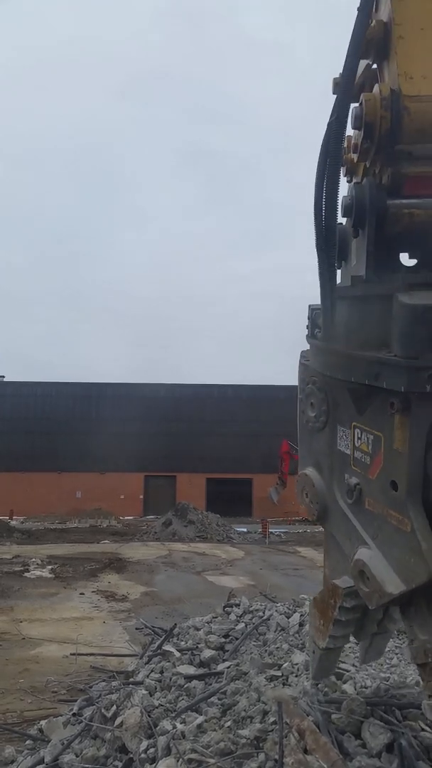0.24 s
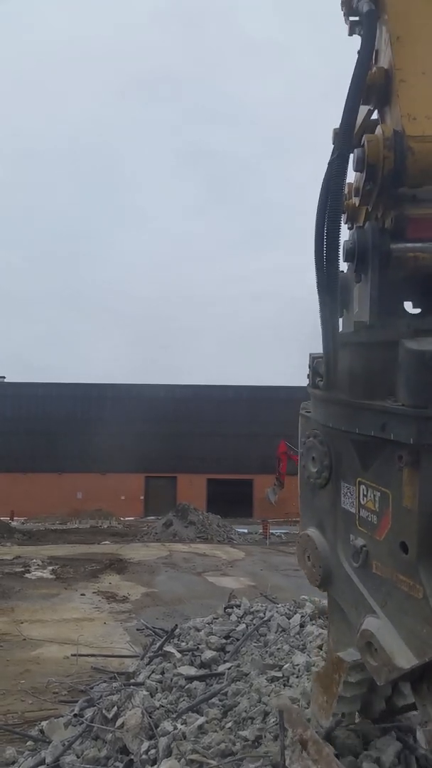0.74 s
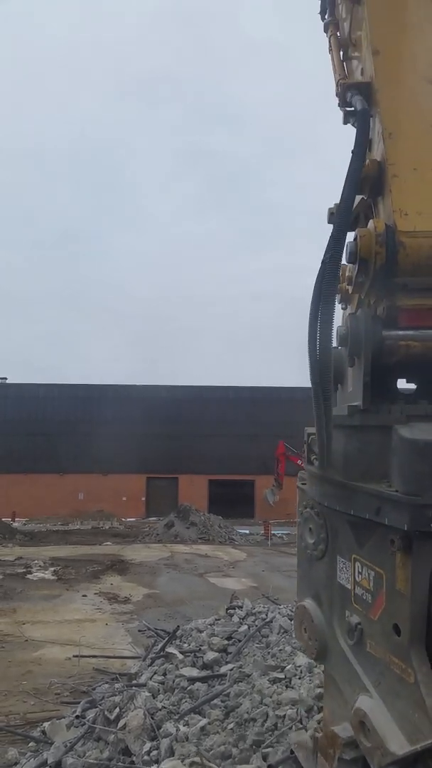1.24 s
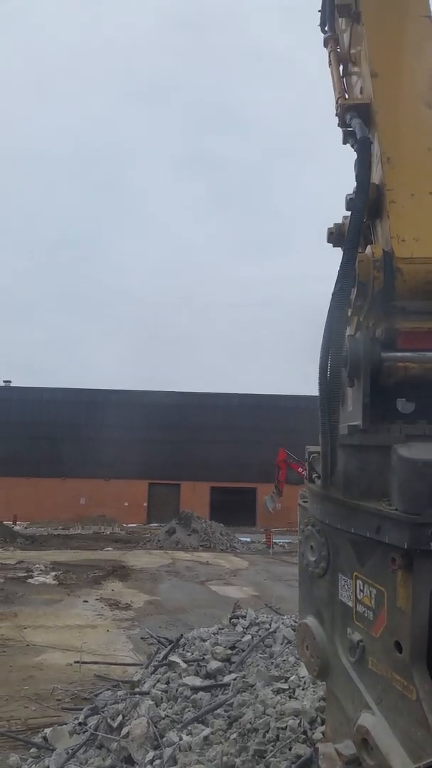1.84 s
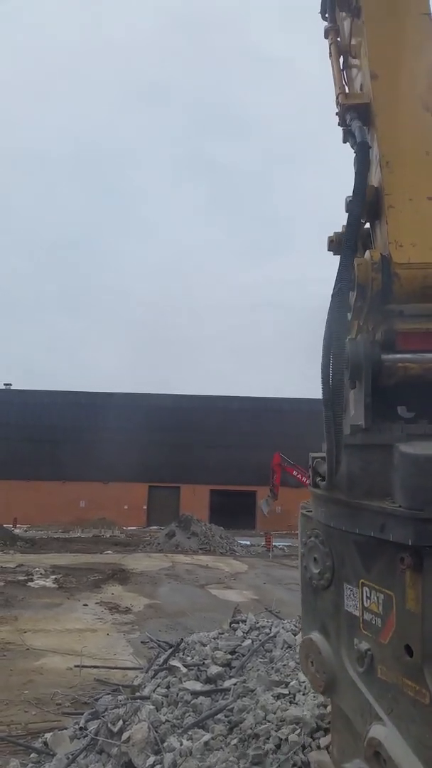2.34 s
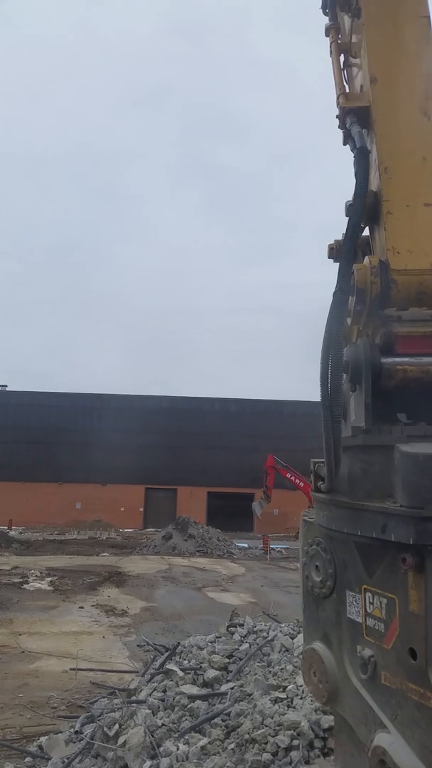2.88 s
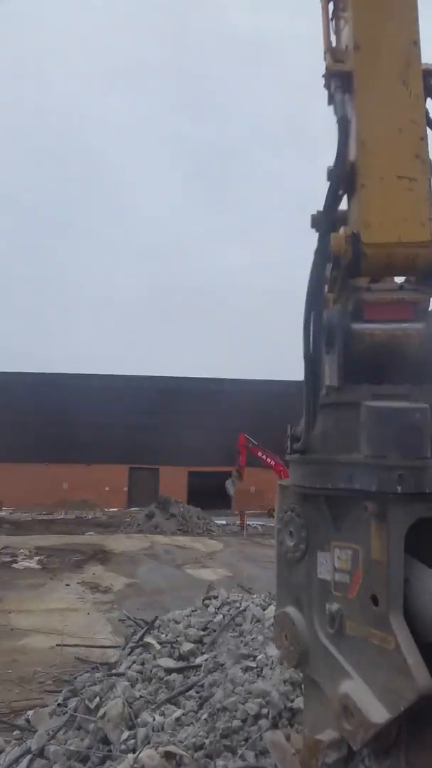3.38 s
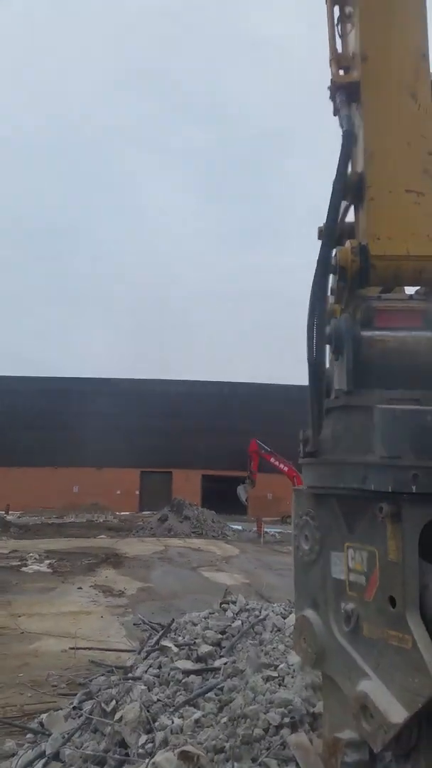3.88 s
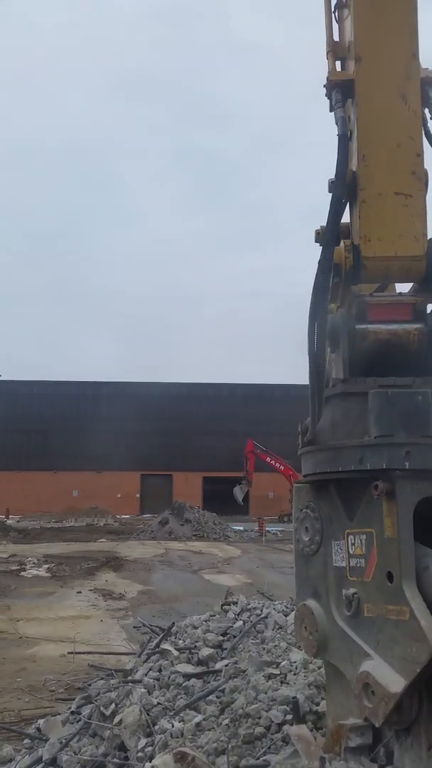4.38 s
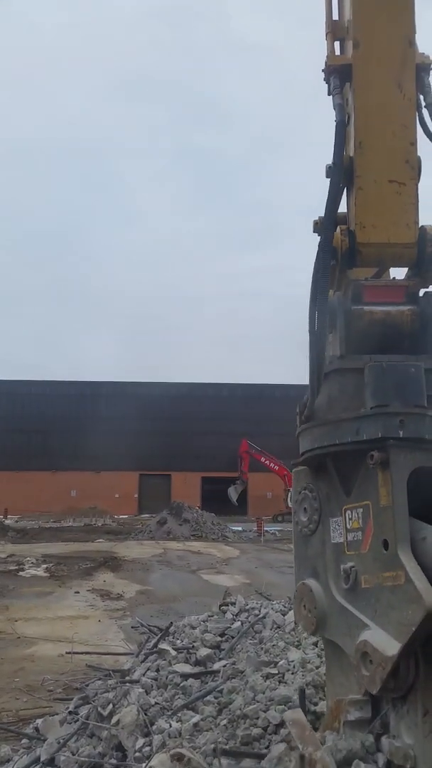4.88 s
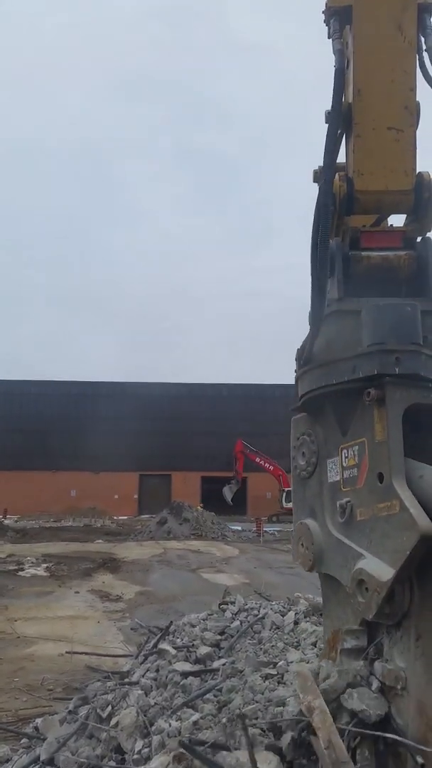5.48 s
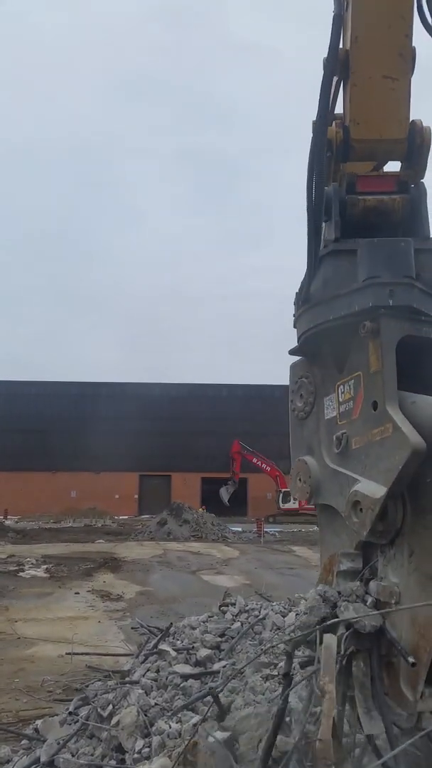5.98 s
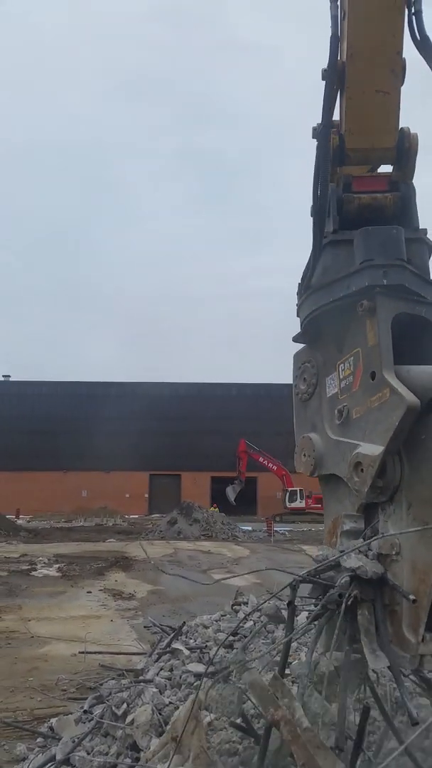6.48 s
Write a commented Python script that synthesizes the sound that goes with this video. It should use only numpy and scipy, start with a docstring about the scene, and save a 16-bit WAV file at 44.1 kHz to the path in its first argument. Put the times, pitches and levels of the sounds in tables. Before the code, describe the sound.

A large diesel excavator labours close by outdoors, with low firing drone, pump whine and a hydraulic hiss swelling just after one second, then easing to a lighter idle. The left microphone hears it clearly; the right is covered by a finger, so the machine is dull there under rubbing, popping thumps and sharp case creaks, worst between three and four seconds, some overloading.

```python
"""A diesel excavator works a concrete crusher in an open yard: crankshaft orders, pump whine and shaped oil noise.
The left microphone port is open to it. A finger covers the right one: a filter and a short delay dull the machine.
Skin drags as lumpy noise and slips in pulses that ring the air pocket and knock the case.
The case creaks in clusters of decaying modes. The loudest thumps clip."""
import sys
import numpy as np
from scipy import signal
from scipy.fft import rfft, irfft, next_fast_len
from scipy.io import wavfile
from scipy.ndimage import map_coordinates

SR = 44100
rng = np.random.default_rng(int(sys.argv[2]) if len(sys.argv) > 2 else 0)


def put_to_file(sound):
    """Save the sound as 16-bit audio at rate SR, in the file named by the first command-line argument."""
    columns = np.atleast_2d(sound).T  # one column per channel
    safe = np.clip(columns, -1, 1)
    whole_steps = np.round(safe * 32767)
    wavfile.write(sys.argv[1], SR, whole_steps.astype(np.int16))


N = 296793

# Levels in the tables are relative: the functions add mix gains. Spectra give shape.
# engine load, heavy while the arm comes down: (time [s], firing level [dB], casing roar level [dB])
ENGINE_LOAD = [(0, -15, -24), (.3, -16.5, -23), (.6, -18, -24), (1.0, -15.5, -19.5), (1.42, -16, -19.5),
               (1.53, -26, -27), (1.68, -27, -24.5), (1.85, -28, -36.5), (2.15, -29.5, -33),
               (3.22, -27, -29), (3.95, -29, -35), (4.3, -29, -28.5), (5.38, -26.5, -31.5),
               (5.72, -30.5, -40.5), (6.0, -23, -33), (6.73, -22, -32.5)]
# crankshaft speed: (time [s], frequency [Hz])
CRANK_SPEED = [(0, 29.65), (.25, 30.8), (.5, 30.4), (.78, 29.7), (1.05, 29.6), (1.35, 29.85), (1.9, 31.21),
               (2.3, 30.16), (3.2, 30.59), (4.05, 30.76), (4.35, 30), (4.85, 30.72), (5.4, 30.13),
               (5.9, 29.75), (6.35, 29.56), (6.73, 29.6)]
# engine firing tones: (multiple of crankshaft speed [1], level [dB])
FIRING_ORDERS = [(2, 4), (3, -11), (4, -9), (5.5, -14), (6, -13)]
# gear tones: (multiple of crankshaft speed [1], level [dB])
GEAR_ORDERS = [(9, -5), (10, -4), (13.4, -9), (14, -7), (19.1, -10), (20, -5), (22.4, -8), (24, -10)]
# pumps and drive gears feeding a cylinder: (start [s], end [s], multiple of crankshaft speed [1], level [dB])
PUMP_WHINES = [(.14, .5, 10, -24.5), (1.02, 1.42, 10, -30), (.68, 1.4, 15, -25.5), (.08, .6, 30, -34.5),
               (1.38, 1.48, 30, -37), (2.03, 2.2, 30, -40), (4.3, 5.1, 18, -39), (5.88, 6.38, 18, -35.5)]
PUMP_RISE_S, PUMP_FALL_S = 0.14, 0.052
# the fan holds its own pitch; level relative to the casing roar curve
FAN_HZ, FAN_DB = 445, -11
# exhaust rumble spectrum: (frequency [Hz], density [dB per Hz])
RUMBLE_SPECTRUM = [(15, -70), (28, 10.5), (70, 8.5), (98, 19.5), (135, 10), (230, 10.5), (500, -61.5)]
# rumble level over the roar curve where that is at FULL_ROAR_DB, and its growth
FULL_ROAR_DB, RUMBLE_OVER_DB, RUMBLE_DB_PER_ROAR_DB = -26.5, -0.5, 0.94
# casing roar spectrum: (frequency [Hz], density [dB per Hz])
ROAR_SPECTRUM = [(100, -10), (220, -9.5), (300, 12.5), (430, 3), (650, -0.5), (900, -11.5), (1200, -29.5),
                 (2000, -12.5), (4000, -75.5)]
# exhaust booms under load: (start [s], end [s], level [dB])
BOOMS = [(0.22, 0.372, -21.5), (.62, 0.774, -19.5), (1.24, 1.46, -18.5), (2.572, 2.637, -26),
         (4.956, 5.548, -27.5)]
BOOM_HZ, BOOM_WANDER_HZ, BOOM_FADE_S = 92.12, 2.45, .09
# oil flow through the valves: (time [s], hiss level [dB], jet sizzle level relative to the hiss [dB])
OIL_FLOW = [(0, -39.5, -11.5), (.45, -36.5, -13), (1.2, -23, -18), (1.4, -30, -17.5), (1.53, -43.5, -9),
            (2.1, -38.5, -17.5), (2.83, -35.5, -22.5), (3.9, -45, -14), (4.2, -41.5, -22),
            (5.35, -38.5, -24), (5.85, -41, -15), (6.08, -37, -14), (6.35, -41.5, -11), (6.73, -42, -19)]
# oil hiss spectrum: (frequency [Hz], density [dB per Hz])
HISS_SPECTRUM = [(400, -21), (800, 0.5), (1100, 1), (1400, -4), (1720, -3), (2100, -7.5), (2650, -9),
                 (3000, -26), (4200, -29), (5400, -49.5), (8000, -74)]
# oil jet sizzle spectrum: (frequency [Hz], density [dB per Hz])
SIZZLE_SPECTRUM = [(1800, -13.5), (2900, 3), (4300, -8.5), (5000, -25), (6000, -33.5), (8000, -57.5),
                   (15000, -63)]
# valve block resonances: (frequency [Hz], level [dB])
VALVE_MODES = [(1290, -2.5), (1420, -3.5), (1570, -4), (1700, -1), (2590, -7), (2740, -12)]
VALVE_DB = -1.5  # relative to the hiss curve
# oil surges through the valves: (start [s], end [s], level [dB])
SURGES = [(1.08, 1.381, -36.5), (1.335, 1.376, -32), (2.81, 3.196, -47.5), (6.138, 6.16, -34.5),
          (6.211, 6.223, -38)]
# oil surge spectrum: (frequency [Hz], density [dB per Hz])
SURGE_SPECTRUM = [(700, -16), (1750, 5.5), (2200, -2.5), (2650, 1), (3000, -10), (3500, -3.5), (4200, -14),
                  (5200, -29.5), (8000, -56.5)]
# the rise is a fixed time plus a share of the surge's length
SURGE_RISE_S, SURGE_RISE_SHARE, SURGE_FALL_S = .035, .7, .09
# steel scraping in the jaws: (time [s], length [s], frequency [Hz], width [Hz], level [dB])
SCRAPES = [(0.86, 0.12, 3810, 280, -40), (4.492, 1.25, 1455, 169.3, -38.5),
           (5.392, 0.058, 3530, 1800, -41.5), (5.393, 0.073, 6030, 2360, -63)]
# arm shudders as the jaws bear down: (start [s], end [s], level [dB])
SHUDDERS = [(1.796, 1.834, -25.5), (5.342, 5.49, -26)]
SHUDDER_HZ = 29.3
# transmission into the covered port: (frequency [Hz], gain [dB])
COVERED_PORT = [(30, -22.5), (60, -1), (95, 1.5), (122, 10), (170, -7), (240, -9), (450, -17.5),
                (900, -14.5), (1700, -19), (4300, -19), (6000, -7)]
# air pocket under the finger, higher under pressure: (time [s], frequency [Hz])
AIR_POCKET = [(0, 119.9), (1.4, 130.5), (1.6, 164.6), (1.8, 174.1), (2.9, 129), (3.3, 173.2), (4, 189.8),
              (4.3, 101), (5.2, 105.6), (5.6, 122.3)]
# finger drags across the port: (start [s], end [s], level [dB])
DRAGS = [(0.041, 1.348, -20), (1.436, 1.986, -19), (2.221, 2.24, -21.5), (2.574, 2.864, -19),
         (2.89, 3.525, -17.5), (3.635, 4.079, -18.5), (4.254, 4.583, -19), (4.698, 5.8, -16.5),
         (6.346, 6.402, -24), (6.715, 6.75, -22.5)]
DRAG_RISE_S, DRAG_FALL_S, RESTING_DB = 0.09, 0.17, -30.5
# skin friction spectrum: (frequency [Hz], density [dB per Hz])
FRICTION_SPECTRUM = [(20, -17), (50, -15), (100, -0.5), (130, -1.5), (200, -13.5), (330, -28.5),
                     (700, -32.5), (4000, -92.5)]
# tiny slips: rate per unit gain of drag above resting, level at zero pressure, change per unit pressure
TINY_PER_S, TINY_DB, TINY_PRESS_DB = 560, 5, -11.5
# strong slips of the skin: (time [s], snap level [dB], thump level [dB])
STRONG_SLIPS = [(0.592, -17, 0.5), (1.428, -28.5, 1), (1.443, -20.5, 0), (1.487, -9.5, 5),
                (1.5145, -11, -0.5), (1.533, -18, -2.5), (1.5795, -18, 2), (1.6248, -21, -2),
                (1.647, -18, -9.5), (1.7463, -15.5, 0), (1.7641, 0, -4.5), (1.816, -16, -4.5),
                (1.827, -10.5, 5.5), (1.847, -23, 0.5), (1.8747, -12, -8), (1.9477, -21.5, -22),
                (1.997, -18, -21), (2.009, -25.5, -1.5), (2.2251, -32, -2.5), (2.7671, -16.5, 0),
                (2.7966, -13.5, -4), (2.831, -16, -1.5), (2.878, -11.5, -1.5), (2.9253, -8.5, 7),
                (2.9732, -11, 2.5), (2.993, -16.5, 1), (3.0315, -10, 1.5), (3.0591, -12, -6),
                (3.079, -17, -2), (3.1963, -12.5, 0.5), (3.2059, -7, 1), (3.237, -6.5, 3),
                (3.257, -2.5, -5), (3.333, 0, 4), (3.3466, -12, 0), (3.364, -9.5, 10.5),
                (3.4157, -11, -3.5), (3.4256, -17.5, -3.5), (3.4653, -30, 1), (3.4763, -22.5, 0.5),
                (3.4885, -15.5, 4), (3.5346, -11, 0.5), (3.654, 3.5, 2), (3.6859, -17, -3),
                (3.7114, -8.5, 0), (3.7259, -17.5, -2), (3.7978, -15, -1), (3.8206, -22.5, 2),
                (3.8336, -20, -5), (3.8467, -35, 2), (3.9102, -0.5, 5), (3.9254, -16, 0),
                (3.9514, -14.5, -2.5), (3.99, -19.5, 5), (4.0021, -14, 1), (4.0502, -20.5, 2),
                (4.0775, -6.5, 2), (4.2507, -17, -6.5), (4.318, -22, -10), (4.3831, -20.5, -9),
                (4.4453, -22, -5), (4.5187, -15, -3), (4.6809, -17.5, -4), (4.7835, -17.5, -1.5),
                (4.814, -16, -7), (4.8265, -29.5, 4.5), (4.9431, -17.5, -13), (5.021, -17.5, -1),
                (5.123, -20.5, -2.5), (5.1954, -15.5, 3.5), (5.2045, -22, -10), (5.229, -22, 3),
                (5.26, -22.5, 1), (5.2989, -17, 0), (5.3265, -20.5, -3), (5.39, -18, -7.5),
                (5.4572, -13.5, -4), (5.4994, -18, 3.5), (5.5176, -10, -2.5), (5.572, -16, -5),
                (5.6016, -7.5, 1.5), (5.6431, -14, 1), (5.678, -15, -0.5), (5.726, -14, 2.5),
                (5.7542, -15, 3.5), (5.805, -14.5, 1), (5.8243, -18.5, 2)]
# snap filter: (frequency [Hz], response [dB])
SNAP_SPECTRUM = [(60, -19.5), (250, 14.5), (500, 12), (1000, 5.5), (2000, 0), (3000, -12), (4400, -22),
                 (6200, -45), (9000, -75.5), (16000, -72)]
# small slips while the skin grips: span, median rate, then levels relative to the drag
GRIP_START_S, GRIP_END_S = 1.45, 5.85
SMALL_PER_S, SMALL_SNAP_DB, SMALL_THUMP_DB, SMALL_SPREAD_DB = 26, -13, 4, 3
PRESS_THUMP_DB = 3.5  # extra thump per unit pressure
STICK_S = .02  # no small slip this close to a strong one
# shove pitch over the pocket's before scatter; ring settings at zero pressure
SHOVE_RATIO, SHOVE_T60_S, RING_DB, RING_T60_S = 1.493, 0.017, -3, 0.062
# skin pulls on the trapped air before release; level relative to the snap's table level
PULL_DB, PULL_S = -5, 0.0045
LEAK_HZ = 57  # air leaking from under the finger loses slow pressure changes
# case knock modes: (frequency [Hz], level [dB])
KNOCK_MODES = [(400, 1.5), (790, 0), (1080, -10), (1500, -10.5)]
# level relative to the snap's table level; scatter is in log frequency
KNOCK_DB, KNOCK_T60_S, KNOCK_SCATTER = -7, .03, .12
# skin skids in the hardest rubbing
SKID_START_S, SKID_END_S = 3.18, 4.1
# skid grains: mean rate, level relative to the drag, scatter
CRUNCH_PER_S, CRUNCH_DB, CRUNCH_SPREAD_DB = 450, -9.5, 4.5
# crunch filter: (frequency [Hz], response [dB])
CRUNCH_SPECTRUM = [(100, -22), (330, 9), (480, 1), (800, -6), (1300, -9), (4200, -25), (7500, -75)]
# sharp case creaks: (time [s], tick level [dB], ring frequency [Hz], ring level [dB])
CREAKS = [(3.2375, -11.5, 3150, -11.5), (3.248, -10.5, 3400, -23), (3.256, -14, 4080, -12),
          (3.267, -16.5, 3930, -19), (3.3523, -13.5, 3670, -15), (3.4124, -8.5, 3250, -10.5),
          (3.5319, -14.5, 2050, -19), (3.6507, -13, 3590, -15.5), (3.8323, -29, 3600, -29.5),
          (3.907, -18, 3260, -18.5), (3.9923, -22, 3300, -24.5), (4.0746, -18, 3240, -18),
          (5.6792, -29.5, 3520, -31), (5.73, -27.5, 3310, -33.5)]
CREAK_MODES, CREAK_SPREAD, CREAK_RISE_S, CREAK_T60_S = 6, .09, .0003, .042  # spread in log frequency
# case tick filter: (frequency [Hz], response [dB])
CASE_SPECTRUM = [(300, -4), (1000, 4.5), (2400, -1.5), (3200, 1.5), (4200, -4), (5200, -25), (7000, -39.5),
                 (15500, -47)]
# scuffs right across the port: (time [s], level [dB])
SCUFFS = [(3.256, -11), (3.318, -16), (3.37, -17.5), (3.413, -15), (3.437, -23.5), (3.538, -14.5),
          (3.569, -25.5), (3.651, -22.5), (3.909, -26), (3.988, -23), (4.02, -28.5)]
# scuff filter: (frequency [Hz], response [dB])
SCUFF_SPECTRUM = [(500, 13.5), (2000, 8), (4000, 0), (6000, -5.5), (9500, -20), (12000, -13.5), (14800, -1),
                  (16500, -12)]
# skin slides over the port in a fine crackle: (start [s], end [s], grain level [dB])
SLIDES = [(3.293, 3.584, -40), (3.95, 4.073, -48)]
GRAINS_PER_S, GRAIN_SPREAD_DB = 90, 3.5
CLIP_TOP, CLIP_KNEE, TOP_HZ = .92, 8, 16400


def amp(db):
    """Decibels to gain."""
    return 10 ** (np.asarray(db) / 20)


def unit(x):
    """Scale to rms 1."""
    return x / np.sqrt(np.mean(x ** 2) + 1e-20)


def along(points, hz):
    """Interpolate (frequency [Hz], value) points on a log axis."""
    f, v = np.transpose(points)
    return np.interp(np.log(hz + 1), np.log(f + 1), v)


def curves(rows):
    """One value per sample for each column after the time."""
    time_s, *columns = np.transpose(rows)
    return [np.interp(np.arange(N) / SR, time_s, column) for column in columns]


def wobble(rate_hz):
    """A smooth random curve with rate_hz knots a second."""
    knots = rng.standard_normal(int(N * rate_hz / SR) + 4)
    return map_coordinates(knots, [np.arange(N) * rate_hz / SR])


def phase_of(hz):
    """Integrate a frequency curve to radians."""
    return 2 * np.pi * np.cumsum(hz) / SR


def response(spectrum, size=8192):
    """Minimum-phase impulse response with this spectrum, by folding the cepstrum."""
    cepstrum = irfft(np.log(amp(along(spectrum, np.fft.rfftfreq(size, 1 / SR)))))
    cepstrum[1:size // 2] *= 2
    cepstrum[size // 2 + 1:] = 0
    return irfft(np.exp(rfft(cepstrum)))


def colour(x, spectrum):
    """Pass x through a causal filter with this spectrum."""
    return signal.fftconvolve(x, response(spectrum))[:N]


def noise(spectrum):
    """Coloured noise of rms 1."""
    return unit(colour(rng.standard_normal(N), spectrum))


def field(spectrum, shared):
    """Noise at two ports, with a share of its power common to both."""
    common = np.sqrt(shared) * noise(spectrum)
    return common + np.sqrt(1 - shared) * np.array([noise(spectrum), noise(spectrum)])


def narrow(hz, width_hz):
    """Noise of rms 1 in a band round a frequency, which may move."""
    phase = phase_of(hz * np.ones(N))
    return unit(wobble(width_hz) * np.cos(phase) + wobble(width_hz) * np.sin(phase))


def held(start_s, end_s, rise_s, fall_s):
    """Envelope that rises to 1 by start_s, holds until end_s and falls."""
    t = np.arange(N) / SR
    return np.clip(np.minimum(1 + (t - start_s) / rise_s, 1 - (t - end_s) / fall_s), 0, 1)


def add(track, time_s, sound):
    """Mix a sound into a track."""
    part = track[max(0, round(time_s * SR)):][:len(sound)]
    part += sound[:len(part)]


def orders(angle, table, flutter_db):
    """Tones locked to a rotation, each fluttering on its own; rms 1 in all."""
    total = np.zeros(N)
    for multiple, db in table:
        level = amp(db + flutter_db * wobble(7.4))
        phase = multiple * angle + 0.12 * wobble(12) + rng.uniform(0, 2 * np.pi)
        total += level * np.sin(phase)
    return unit(total)


def engine(angle, beat):
    """Firing and gear orders of the crankshaft, with exhaust rumble and pulsed casing roar."""
    firing_db, roar_db = curves(ENGINE_LOAD)
    rumble_db = FULL_ROAR_DB + RUMBLE_OVER_DB + RUMBLE_DB_PER_ROAR_DB * (roar_db - FULL_ROAR_DB)
    firing = amp(firing_db) * orders(angle, FIRING_ORDERS, flutter_db=2.5)
    gears = amp(roar_db - 4.5) * orders(angle, GEAR_ORDERS, flutter_db=2)
    # the rumble barely gets past the finger
    rumble = amp(rumble_db + wobble(5.4)) * amp([[0], [-9]]) * field(RUMBLE_SPECTRUM, shared=0.21)
    roar = amp(roar_db - 3.5) * (1 + 0.8 * beat) * field(ROAR_SPECTRUM, shared=0.069)
    return firing + gears + rumble + roar


def fan():
    """A cooling-fan tone off the crankshaft's pitch, as loud as the load allows."""
    angle = phase_of(FAN_HZ * (1 + .004 * wobble(3)))
    return amp(curves(ENGINE_LOAD)[1] + FAN_DB) * orders(angle, [(1, 0)], flutter_db=1.5)


def pumps(angle):
    """Pumps and drive gears whine at crankshaft orders while they feed a cylinder."""
    total = np.zeros(N)
    for start_s, end_s, multiple, db in PUMP_WHINES:
        envelope = amp(db) * held(start_s, end_s, PUMP_RISE_S, PUMP_FALL_S)
        total += envelope * orders(angle, [(round(multiple), 0)], flutter_db=1.5)
    return total


def oil_hiss(beat):
    """Turbulent oil hisses and its jets sizzle, pulsed slightly by the engine."""
    hiss_db, sizzle_db = curves(OIL_FLOW)
    hiss = field(HISS_SPECTRUM, shared=0.065)
    sizzle = amp(sizzle_db + 3.5 + 0.67 * wobble(25)) * field(SIZZLE_SPECTRUM, shared=0.2)
    return (hiss + sizzle) * amp(hiss_db + 1.2 * wobble(27)) * (1 + 0.14 * beat)


def valve():
    """Turbulent oil excites a few resonances, each swelling on its own."""
    song = sum(amp(db + 2 * wobble(11)) * narrow(hz, width_hz=130) for hz, db in VALVE_MODES)
    return amp(curves(OIL_FLOW)[0] + VALVE_DB) * unit(song)


def pressure(pocket_hz):
    """How hard the finger presses, 0-0.9, from the pitch of the air pocket."""
    return np.clip((pocket_hz - 120) / 70, 0, .9)


def dragging():
    """How strongly the skin drags, as a gain: strokes over a resting finger."""
    strokes = [amp(db) * held(start_s, end_s, DRAG_RISE_S, DRAG_FALL_S) for start_s, end_s, db in DRAGS]
    return np.maximum(amp(RESTING_DB), np.max(strokes, axis=0))


def rubbing():
    """Skin drags in uneven lumps, with more pocket-pitched noise under pressure, and tiny slips."""
    drag = dragging()
    pocket_hz = curves(AIR_POCKET)[0]
    press = pressure(pocket_hz)
    loose = np.sqrt(1 - press) * noise(FRICTION_SPECTRUM)
    tight = 0.51 * np.sqrt(press) * narrow(1.2 * pocket_hz, width_hz=260)
    lumps = unit(amp(2.3 * wobble(45)) * (loose + tight))
    # tiny slips come thicker in a stronger drag, weaker under pressure
    rate_hz = TINY_PER_S * (drag - amp(RESTING_DB)) * (np.arange(N) < GRIP_END_S * SR)
    tiny_db = TINY_DB + TINY_PRESS_DB * press + 3.2 * rng.standard_normal(N)
    tiny = (rng.random(N) < rate_hz / SR) * amp(tiny_db)
    return drag * (amp(3.0) * lumps + colour(tiny, SNAP_SPECTRUM))


def booms():
    """The exhaust booms under load in a narrow, wandering band."""
    level = sum(amp(db) * held(start_s, end_s, BOOM_FADE_S, BOOM_FADE_S) for start_s, end_s, db in BOOMS)
    angle = phase_of(BOOM_HZ + BOOM_WANDER_HZ * wobble(10))
    return level * orders(angle, [(1, 0)], flutter_db=4)


def excavator():
    """Engine, fan, pumps, oil and exhaust booms as they arrive at the two ports."""
    angle = phase_of(curves(CRANK_SPEED)[0] * (1 + 0.0012 * wobble(7)))
    beat = np.cos(3 * angle)  # six cylinders fire three times a turn
    machine = engine(angle, beat) + fan() + pumps(angle) + oil_hiss(beat)
    return machine + amp([[0], [-6]]) * booms()


def slips(events):
    """Each slip pulls, snaps, shoves the trapped air and rings the pocket; in a skid it stutters on."""
    snaps, thumps = np.zeros(N), np.zeros(N)
    release = signal.windows.blackman(18)
    ramp = np.linspace(0, 1, round(PULL_S * SR))
    pull = -np.convolve(ramp, release / release.sum())[:-len(release) // 4]
    t = np.arange(SR // 5) / SR
    scatter = rng.standard_normal((len(events), 2))
    for (time_s, snap_db, thump_db), (shove_scatter, ring_scatter) in zip(events, scatter):
        pocket_hz = np.interp(time_s, *np.transpose(AIR_POCKET))
        press = pressure(pocket_hz)
        shove_hz = SHOVE_RATIO * pocket_hz * np.exp(0.32 * shove_scatter)
        shove = amp(-60 * t / SHOVE_T60_S) * np.cos(2 * np.pi * shove_hz * t)
        # a firm finger drives the pocket harder and damps it sooner
        ring_t60_s = RING_T60_S * (1 - 0.26 * press)
        ring_hz = pocket_hz * np.exp(0.13 * ring_scatter)
        ring = amp(RING_DB + 2.6 * press - 60 * t / ring_t60_s) * np.cos(2 * np.pi * ring_hz * t)
        onset = (1 - np.exp(-t / 0.00068)) ** 2
        add(thumps, time_s, amp(thump_db + 1.5) * (shove + ring) * onset)
        rate_hz = 600 * press * (SKID_START_S < time_s < SKID_END_S)
        hits = (rng.random(len(t)) < rate_hz / SR) * rng.standard_normal(len(t))
        stutter = hits * amp(-2.0 - 60 * t / 0.024)
        stutter[0] = 1
        add(snaps, time_s, amp(snap_db + 22.5) * stutter)
        add(thumps, time_s - len(pull) / SR, amp(snap_db + PULL_DB) * pull)
    leak = signal.butter(1, LEAK_HZ, "highpass", fs=SR)
    return signal.lfilter(*leak, thumps) + colour(snaps, SNAP_SPECTRUM)


def knocks(events):
    """Each slip rings the case's modes briefly, with scattered pitch: rows (time [s], level [dB])."""
    track = np.zeros(N)
    t = np.arange(SR // 10) / SR
    scatter = rng.standard_normal((len(events), len(KNOCK_MODES), 2))
    for (time_s, db), chances in zip(events, scatter):
        ring = np.zeros(len(t))
        for (hz, mode_db), (level_scatter, pitch_scatter) in zip(KNOCK_MODES, chances):
            mode_hz = hz * np.exp(KNOCK_SCATTER * pitch_scatter)
            ring += amp(mode_db + 2 * level_scatter) * np.sin(2 * np.pi * mode_hz * t)
        add(track, time_s, amp(db + KNOCK_DB - 60 * t / KNOCK_T60_S) * ring)
    return track


def bursts(events, spectrum, t60_s, tail_db):
    """A sharp tick with a short gritty tail for each event."""
    track = np.zeros(N)
    t = np.arange(SR // 20) / SR
    for time_s, db in events:
        rough = rng.standard_normal(len(t)) * np.exp(.5 * rng.standard_normal(len(t)))
        grit = amp(tail_db - 60 * t / t60_s) * rough
        grit[0] = 1
        add(track, time_s, amp(db) * grit)
    return colour(track, spectrum)


def scrapes():
    """Rough squeals and groans of steel: narrow noise under half-sine swells."""
    t = np.arange(N) / SR
    squeals = np.zeros(N)
    for time_s, length_s, hz, width_hz, db in SCRAPES:
        swell = np.sin(np.pi * np.clip((t - time_s) / length_s, 0, 1))
        squeals += amp(db) * swell * narrow(hz, width_hz)
    return squeals * amp(1.5 * wobble(220))


def surges():
    """Oil spurts unevenly as the valves open wider."""
    level = np.zeros(N)
    for start_s, end_s, db in SURGES:
        rise_s = SURGE_RISE_S + SURGE_RISE_SHARE * (end_s - start_s)
        level += amp(db) * held(start_s, end_s, rise_s, SURGE_FALL_S)
    return level * amp(3.9 * wobble(70)) * field(SURGE_SPECTRUM, shared=0.15)


def small_slips():
    """Stick and slip at an uneven rate, louder with drag: rows (time [s], snap [dB], thump [dB])."""
    drag_db = 20 * np.log10(dragging())
    press = pressure(curves(AIR_POCKET)[0])
    chance = rng.standard_normal((400, 3))
    times_s = GRIP_START_S + np.cumsum(np.exp(.5 * chance[:, 0])) / SMALL_PER_S
    strong_s = np.transpose(STRONG_SLIPS)[0]
    rows = []
    for time_s, (snap_scatter, thump_scatter) in zip(times_s, SMALL_SPREAD_DB * chance[:, 1:]):
        if time_s < GRIP_END_S and np.abs(strong_s - time_s).min() > STICK_S:
            i = round(time_s * SR)
            snap_db = drag_db[i] + SMALL_SNAP_DB + snap_scatter
            thump_db = drag_db[i] + SMALL_THUMP_DB + PRESS_THUMP_DB * press[i] + thump_scatter
            rows.append((time_s, snap_db, thump_db))
    return rows


def shudder():
    """A deep tremor of the arm, alike at both ports."""
    level = sum(amp(db) * held(start_s, end_s, DRAG_RISE_S, DRAG_FALL_S) for start_s, end_s, db in SHUDDERS)
    return level * narrow(SHUDDER_HZ, width_hz=18)


def crunch():
    """Skidding skin sheds a dense run of dull grains."""
    hits = (rng.random(N) < CRUNCH_PER_S / SR) * rng.choice([-1, 1], N)
    grains = hits * amp(CRUNCH_SPREAD_DB * rng.standard_normal(N))
    skid = dragging() * held(SKID_START_S, SKID_END_S, 0.014, 0.016)
    return amp(CRUNCH_DB) * skid * unit(colour(grains, CRUNCH_SPECTRUM))


def creaks():
    """Each creak rings a cluster of close modes, pitched by where the case is squeezed."""
    track = np.zeros(N)
    t = np.arange(SR // 10) / SR
    chances = rng.standard_normal((len(CREAKS), 2, CREAK_MODES, 1))
    for (time_s, _, hz, db), (detune, phase) in zip(CREAKS, chances):
        cycles = hz * np.exp(CREAK_SPREAD * detune) * t + phase
        ring = np.sin(2 * np.pi * cycles).sum(axis=0) / np.sqrt(CREAK_MODES)
        onset = (1 - np.exp(-t / CREAK_RISE_S)) ** 2
        add(track, time_s, amp(db - 60 * t / CREAK_T60_S) * onset * ring)
    return track


def slide_grains():
    """Tiny scuffs at random moments of each slide: rows (time [s], level [dB])."""
    rows = []
    for start_s, end_s, db in SLIDES:
        waits, sizes = rng.exponential(size=80), rng.standard_normal(80)
        times_s = start_s + np.cumsum(waits) / GRAINS_PER_S
        rows += [(s, db + GRAIN_SPREAD_DB * size) for s, size in zip(times_s, sizes) if s < end_s]
    return rows


def scene():
    """The open port hears the machine; the covered one hears it late and dull, under the finger."""
    left, right = excavator() + valve() + surges() + scrapes()
    rub = rubbing()
    every_slip = list(STRONG_SLIPS) + small_slips()
    snap_levels = [row[:2] for row in every_slip]
    finger = slips(every_slip) + crunch() + knocks(snap_levels)
    slip_ticks = bursts(snap_levels, CASE_SPECTRUM, t60_s=0.036, tail_db=-25.5)
    creak_ticks = bursts([row[:2] for row in CREAKS], CASE_SPECTRUM, t60_s=0.04, tail_db=-22)
    scuffs = bursts(list(SCUFFS) + slide_grains(), SCUFF_SPECTRUM, t60_s=0.017, tail_db=-7.5)
    left = left + creaks() + amp(25) * creak_ticks + amp(4.0) * slip_ticks
    left = left + amp(-35.0) * finger + amp(-11.0) * scuffs
    covered = np.pad(colour(right, COVERED_PORT), (22, 0))[:N]  # 0.5 ms late
    right = covered + rub + finger + amp(2.0) * creak_ticks + amp(8.0) * scuffs
    return np.array([left, right]) + shudder()


def record(dry):
    """Overload flattens the peaks, then the band limit rounds the corners."""
    clipped = dry / (1 + np.abs(dry / CLIP_TOP) ** CLIP_KNEE) ** (1 / CLIP_KNEE)
    size = next_fast_len(N + 4096)
    passband = np.fft.rfftfreq(size, 1 / SR) < TOP_HZ
    return irfft(rfft(clipped, size) * passband, size)[:, :N]


dry = scene()
out = record(dry)
put_to_file(out)
```